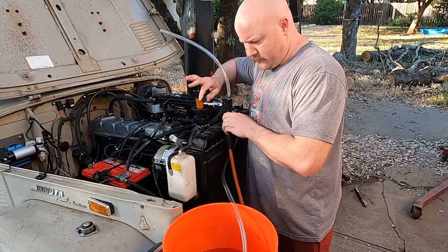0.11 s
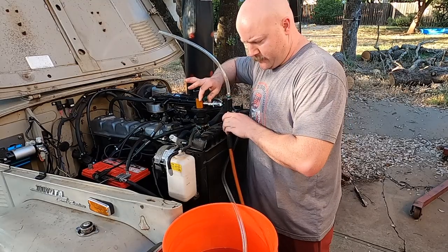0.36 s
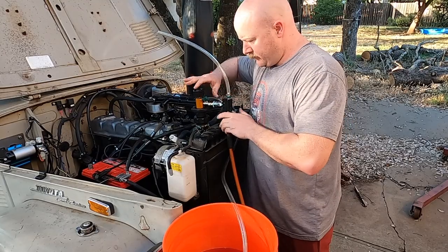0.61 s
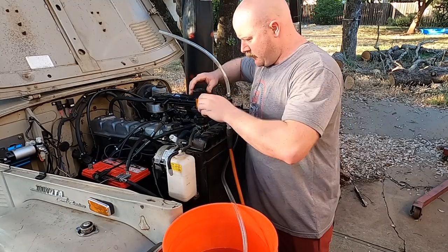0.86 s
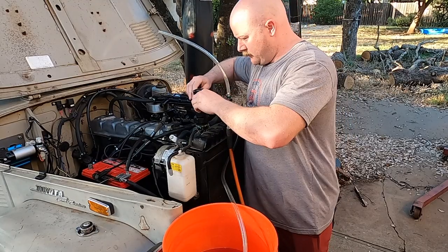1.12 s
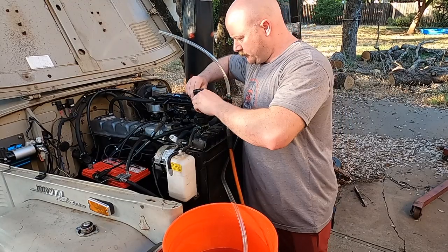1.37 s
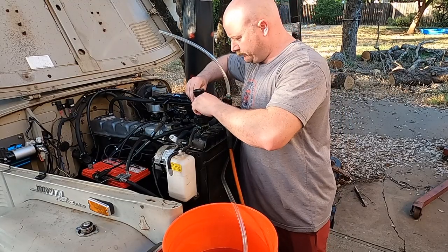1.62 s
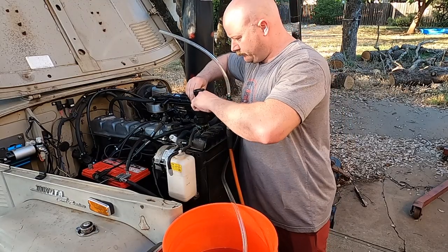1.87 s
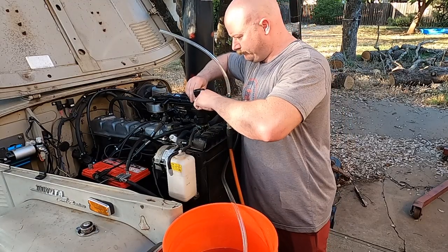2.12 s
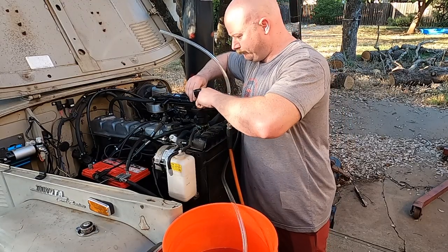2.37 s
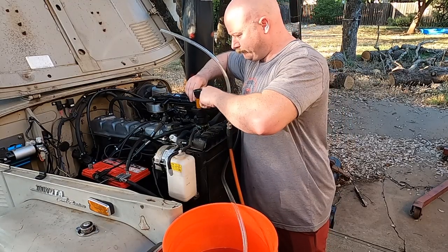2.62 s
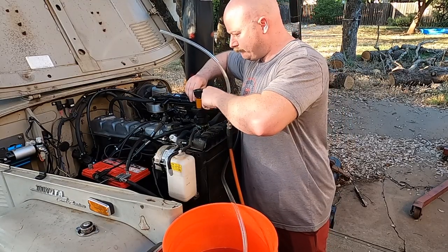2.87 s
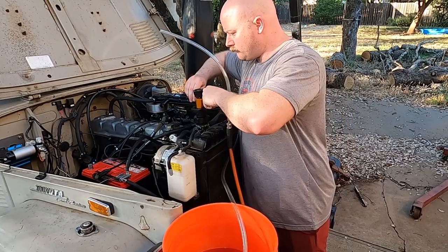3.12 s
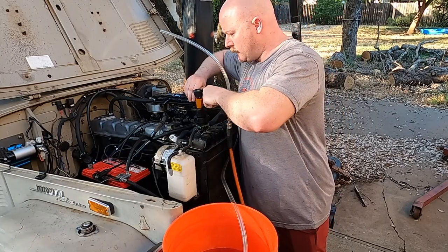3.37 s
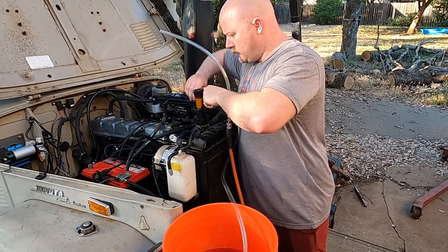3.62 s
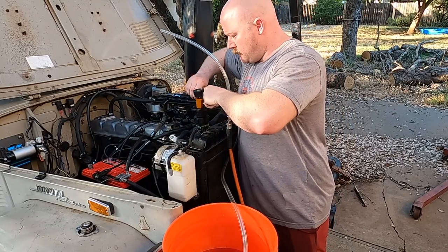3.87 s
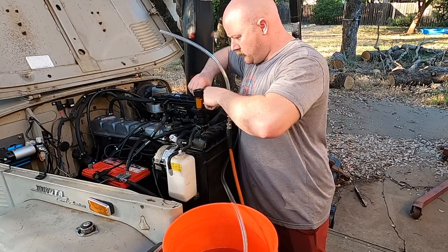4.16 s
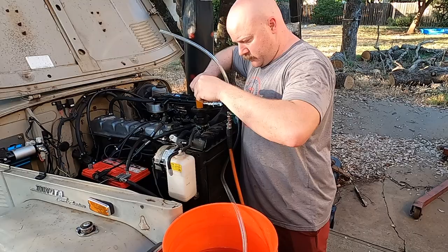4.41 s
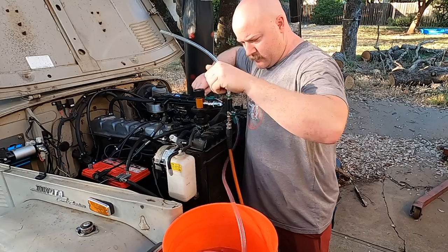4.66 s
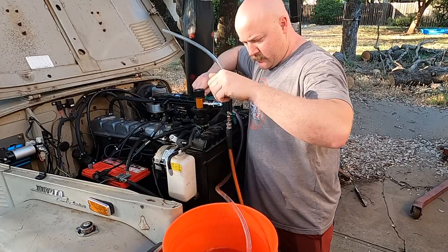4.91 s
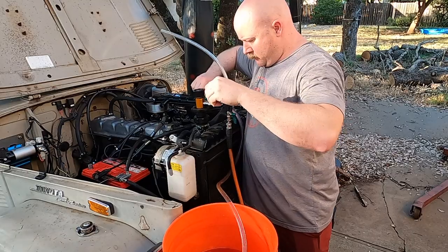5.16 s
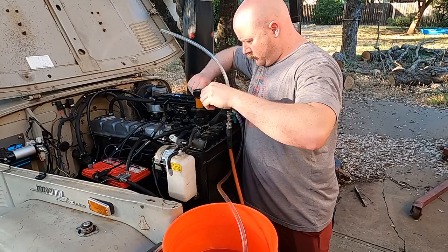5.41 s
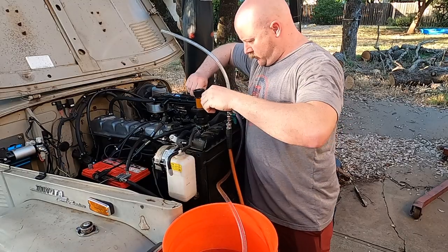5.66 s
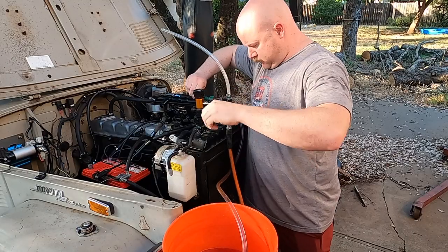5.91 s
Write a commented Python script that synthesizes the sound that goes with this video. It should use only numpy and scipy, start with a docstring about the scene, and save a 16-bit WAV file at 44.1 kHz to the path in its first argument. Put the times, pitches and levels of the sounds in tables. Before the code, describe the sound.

A steady high air jet dominates, close on the left and fainter, more diffuse on the right, with short reflections from bonnet and engine. Only a tiny early dropout interrupts it. Late on, the valve opens at once and the hiss gains low-mid body while losing some sharpness. Faint hand rubbing and a small dull knock with quick bounces follow. Slow, very low breeze rumble lies underneath.

```python
"""A bright hiss: compressed air blows through a venturi vacuum tool on a radiator, outdoors under an open bonnet.
Turbulence noise rings in the short exhaust pipe and hisses straight from the nozzle; bonnet and engine scatter it.
Near the end a valve is turned and the rush gets fuller and lower, with a dull knock and hands brushing the tool.
The left microphone is near the tool, the right one far; light wind pushes slowly on both as low noise."""
import sys
import numpy as np
from scipy import signal
from scipy.fft import rfft, irfft, next_fast_len
from scipy.io import wavfile
from scipy.ndimage import map_coordinates

SR = 44100
rng = np.random.default_rng(int(sys.argv[2]) if len(sys.argv) > 2 else 0)


def wav_record(signal):
    """Record a signal, one row per channel, as 16-bit PCM in the file named by sys.argv[1]."""
    frames = np.transpose(np.atleast_2d(signal))
    bounded = np.clip(frames, -1, 1)
    # unit amplitude maps onto the largest positive 16-bit level
    quanta = np.round(bounded * 32767).astype(np.int16)
    wavfile.write(sys.argv[1], SR, quanta)


def ratio_of_db(decibels):
    """Turn decibels (scalar or array-like) into linear amplitude factors; 0 dB maps to 1."""
    return 10 ** (np.asarray(decibels, float) / 20)


N = 265526                                                  # samples
SIZE = next_fast_len(N + 8192)                              # room for the tails
HZ = np.maximum(np.arange(SIZE // 2 + 1) * SR / SIZE, .3)   # kept above 0 for the logarithm
TIME_S = np.arange(N) / SR

# level of the shut-valve hiss, averaged over both sides, before scatter and arm; it sags from the turn on
JET_DB, SAG_DB_PER_S = -24.5, -0.1
TURN_S, TURN_LENGTH_S = 4.925, 0.01


def jet(flutter_db=-0.28, fast_db=0.32):
    """Turbulence drives the pipe and hisses beside it; the valve blends two colours of the same noise."""
    left, other = [white() * pipe() + white() * nozzle() for side in (0, 1)]
    right = far_side(left, other)
    heard = np.array([left * echoes(0) * hollows(0), right * echoes(1) * hollows(1)])
    shut = irfft(heard, SIZE)[:, :N]
    opened = irfft(heard * opened_colour(), SIZE)[:, :N]
    opening = valve()
    blend = (1 - opening) * shut + opening * opened
    sag_db = SAG_DB_PER_S * np.maximum(TIME_S - TURN_S, 0)
    level = ratio_of_db(JET_DB + sag_db + flutter_db * drift(14.0) + fast_db * drift(34.0))
    return scatter(off_arm(level * blend / np.std(shut.mean(axis=0))))


# pipe and housing resonances: f/Hz, width/Hz, level/dB
PIPE_MODES = [(619, 46.4, -20), (1014, 55.3, -11.5), (1444, 115, -17.5), (1821.5, 63.5, -9),
              (2253, 121, -10.5), (2603, 100, -7.5), (3047, 79, -6), (3404, 90, -6), (3819, 93, -4.5),
              (4239, 109, -0.7), (4676, 170, 0.05), (5123, 120, 1), (5530, 106, 2), (5850, 122, 0.5),
              (6306, 130, 0.9), (6714, 99, 0.7), (7220, 110, 0.5), (7770, 80, -1.6), (8090, 140, -4.1),
              (8320, 87, 0), (8785, 112, -1), (9130, 59, -4), (9396, 134, -4), (10270, 160, 2.5),
              (10210, 230, -4), (10930, 170, -7), (11420, 59, -4.5), (11910, 170, -6), (12040, 81, -16),
              (13000, 91, -12)]


def pipe():
    """Response of the resonances in parallel, signs alternating."""
    response = 0
    for k, (hz, width_hz, db) in enumerate(PIPE_MODES):
        response = response + (-1) ** k * ratio_of_db(db) / (1 + 1j * (HZ - hz ** 2 / HZ) / width_hz)
    return response


# hiss straight from the nozzle, between the resonances: f/Hz, level/dB per Hz
NOZZLE_COLOUR = [(150, -38.5), (400, -33.5), (700, -34.5), (1500, -24), (2800, -18.5), (4000, -24.5),
                 (5300, -8), (7000, -6), (9000, -6.5), (12500, -9), (14000, -11.5), (15000, -9),
                 (15700, -14)]


def nozzle():
    """Gain of the broad turbulence noise that bypasses the pipe."""
    return ratio_of_db(on_grid(NOZZLE_COLOUR))


# right level against left: f/Hz, level/dB
FAR_LEVEL = [(200, -7), (600, -17.5), (1100, -23), (2400, -19), (3500, -25), (4800, -34), (5600, -25),
             (6400, -19.5), (7600, -22), (8400, -15.5), (8800, -30), (10200, -24.5), (12500, -23.5),
             (15700, -20)]
# share of the right signal that is the same noise as the left: f/Hz, share (0-1)
SHARED_NOISE = [(300, .5), (1000, .95), (2500, 1), (4700, .95), (6000, .55), (8500, .4), (10500, .85),
                (15000, .65)]


def far_side(left, other):
    """The far microphone hears part of the near noise 0.21 ms late, in opposite polarity, and part of its own."""
    share = on_grid(SHARED_NOISE)
    lag = -np.exp(-2j * np.pi * HZ * .21 / 1000)
    return ratio_of_db(on_grid(FAR_LEVEL)) * (np.sqrt(share) * left * lag + np.sqrt(1 - share) * other)


# echoes off bonnet, engine and ground: delay/ms, left gain, right gain
ECHO_PATHS = [(1.35, 0.031, -0.057), (1.7, 0.051, -0.039), (2.25, -0.019, 0.04), (3.2, 0.075, 0.032),
              (8.0, 0.11, 0.091), (10.1, 0.074, 0.051)]


def echoes(side):
    """Direct path and a few short reflections."""
    return 1 + sum(row[1 + side] * np.exp(-2j * np.pi * HZ * row[0] / 1000) for row in ECHO_PATHS)


# hollows where paths cancel: f/Hz, width/Hz, left depth (0-1), right depth (0-1); depths are capped at .95
HOLLOW_BANDS = [(959.6, 71, 1, 0.8), (1622, 120, 0.57, 0.5), (2010, 71, 0.3, 0.5), (2824, 69, 0.5, 0.4),
                (3190, 74, 0.4, 0.5), (4190, 150, 0, 0.9), (4270, 76, 0.16, .7), (4600, 140, 0.06, 0.9),
                (5440, 120, 0.05, 0.8), (9550, 160, 0.2, .5)]


def hollows(side):
    """Narrow dips cut into the hiss."""
    out = 1
    for hz, width_hz, *depth in HOLLOW_BANDS:
        shape = 1 + ((HZ - hz) * 2 / width_hz) ** 2
        out = out * (1 - np.clip(depth[side], 0, .95) / shape)
    return out


# colour change with the valve open: f/Hz, level/dB
OPENED_COLOUR = [(300, 7.5), (500, 17), (800, 5), (1300, 16.5), (2000, 14), (3000, 8), (4000, 7),
                 (5000, -3.5), (7000, -7), (9000, -3.2), (12000, 0), (15000, -2.5)]


def opened_colour():
    """Gain that turns the shut-valve hiss into the fully opened one."""
    return ratio_of_db(on_grid(OPENED_COLOUR))


# the valve leaks a little at first, seals slowly, then is turned open (openings 0-1)
LEAK, LEAK_FADE_S, OPENING = 0.047, 1.9, 0.53
# handle nudged wider for a moment: t/s, extra opening (0-1), half length/s
HANDLE_NUDGES = [(4.96, 0, 0.12), (5.84, 0.1, 0.15)]


def valve():
    """Opening 0-1: a fading leak, the turn, and the nudges after it."""
    turned = np.clip((TIME_S - TURN_S) / TURN_LENGTH_S, 0, 1)
    nudged = 0
    for at, more, half_s in HANDLE_NUDGES:
        nudged = nudged + more * np.clip(1 - np.abs(TIME_S - at) / half_s, 0, 1)
    return (1 - turned) * LEAK * np.exp(-TIME_S / LEAK_FADE_S) + turned * (OPENING + nudged)


def off_arm(x, right_share=0.29):
    """The arm reflects the jet: a copy read through a moving delay, weaker on the right."""
    path = arm_path()
    at = np.arange(N) - in_time(path) * SR / 1000
    late = np.array([map_coordinates(side, [at], order=3) for side in x])
    return x + in_time(path, order=2) * late * [[1], [right_share]]


# hand and arm rest in poses near the tool and reflect the jet: arrival t/s, delay/ms, gain at the left
ARM_POSES = [(0, .53, .04), (.72, .55, .14), (1.5, .562, .33), (2.0, .7, .14), (2.8, .555, .28),
             (4.9, .875, .19), (5.95, .945, .2)]
MOVE_MS_PER_S, SHORTEST_MOVE_S, MOVING_GAIN = .5, .2, .05


def arm_path():
    """Rows (t/s, delay/ms, gain): poses are held between moves; in a long move the gain is low midway."""
    rows = [ARM_POSES[0]]
    for (_, ms, gain), (arrival, next_ms, next_gain) in zip(ARM_POSES, ARM_POSES[1:]):
        move_s = abs(next_ms - ms) / MOVE_MS_PER_S
        rows.append((arrival - max(move_s, SHORTEST_MOVE_S), ms, gain))
        if move_s > SHORTEST_MOVE_S:
            rows.append((arrival - move_s / 2, (ms + next_ms) / 2, MOVING_GAIN))
        rows.append((arrival, next_ms, next_gain))
    return rows


# dense scatter, near the moving worker, then the engine bay: start/ms, t60/s, left level/dB,
# right level/dB, changes per s
SCATTER_TAILS = [(.3, 0.03, -10.5, -15.5, 0.78), (3.0, 0.2, -10.5, 0, 0.33)]


def scatter(x):
    """Pairs of dying noise tails on each side, slowly blended as the worker shifts about."""
    s, out = np.arange(8192) / SR, x
    for start_ms, t60, left_db, right_db, per_s in SCATTER_TAILS:
        tails = rng.standard_normal((2, 2, len(s))) * ratio_of_db(-60 * s / t60) * (s > start_ms / 1000)
        tails /= np.linalg.norm(tails, axis=2, keepdims=True)
        first, second = irfft(rfft(x, SIZE) * rfft(tails, SIZE), SIZE)[:, :, :N]
        angle = np.pi * drift(per_s)
        out = out + ratio_of_db([[left_db], [right_db]]) * (np.cos(angle) * first + np.sin(angle) * second)
    return out


def dip(at_s=.3175, half_ms=8.8):
    """Gain that fades to nothing and back for a moment."""
    return np.clip(np.abs(TIME_S - at_s) * 1000 / half_ms, 0, 1)


# a dull knock and its bounces: t/s, strike level/dB
KNOCK_STRIKES = [(5.174, -28.5), (5.194, -31), (5.217, -33)]
# what the knock rings with: f/Hz, level/dB, t60/s
KNOCK_RINGS = [(185, -13, 0.11), (371, -5, 0.15), (620, -11, 0.1), (870, -4.5, 0.059)]


def knocks(right_db=-17.0, thin_hz=110):
    """Each knock strikes every mode; a light object gives no deep bass."""
    out, clicks = np.zeros(N), np.full(N, 1e-18)
    for s, db in KNOCK_STRIKES:
        clicks[round(s * SR)] = ratio_of_db(db)
    for hz, level_db, t60 in KNOCK_RINGS:
        r, w = ratio_of_db(-60 / (t60 * SR)), 2 * np.pi * hz / SR   # decay per sample, turn per sample
        out += ratio_of_db(level_db) * signal.lfilter([0, np.sin(w)], [1, -2 * r * np.cos(w), r * r], clicks)
    thin = signal.butter(4, thin_hz, "high", fs=SR, output="sos")
    return signal.sosfilt(thin, out) * ratio_of_db([[0], [right_db]])


def rustle(right_db=-17.0):
    """Dull band of noise under the brushing hands."""
    band = signal.butter(2, [260, 1500], "band", fs=SR, output="sos")
    noise = rms_one(signal.sosfilt(band, rng.standard_normal((2, N))))
    return noise * brushing() * ratio_of_db([[0], [right_db]])


# hands brush the tool: t/s, level/dB at the left while held, hold/s
HAND_BRUSHES = [(4.86, -42.5, 0.005), (5.003, -44, 0.043), (5.182, -38.5, 0.018), (5.324, -41.5, 0.005),
                (5.76, -40.5, 0.12)]
BRUSH_RISE_DB_PER_S, BRUSH_FALL_DB_PER_S = 398, 228


def brushing():
    """Each brush rises, holds and falls at steady rates in dB."""
    out = 0
    for at, db, hold_s in HAND_BRUSHES:
        rise_db = BRUSH_RISE_DB_PER_S * np.maximum(at - TIME_S, 0)
        fall_db = BRUSH_FALL_DB_PER_S * np.maximum(TIME_S - at - hold_s, 0)
        out = out + ratio_of_db(db - rise_db - fall_db)
    return out


# strength of the breeze, as pressure swings at the left microphone: t/s, level/dB
BREEZE = [(0, -22), (.5, -26.5), (1.15, -20), (1.5, -33), (1.9, -22), (2.5, -32.5), (3.1, -34.5),
          (3.6, -37), (4.0, -35), (4.3, -24), (5.2, -51.5), (5.6, -26.5), (6.02, -35.5)]
# colour of the slow pressure swings: f/Hz, level/dB per Hz
SWING_COLOUR = [(1, 7), (3, 2), (6, 7), (10, -42.5), (16, -10), (30, -77)]
# colour of the rumble: f/Hz, level/dB per Hz
RUMBLE_SPECTRUM = [(10, -15), (18, -17), (30, -5), (60, -7), (120, -19.5), (250, -33), (400, -29)]
# eddies at the microphone ports: level in the mean breeze, share of the breeze's swing they follow
RUMBLE_DB, RUMBLE_FOLLOWS = -53.5, 0.98


def wind(lower_db=3.5, uneven_db=0.5, upper_db=5.0, split_hz=90):
    """Slow pressure swings and a rumble; its level above split_hz fluctuates independently of the part below."""
    gust_db = in_time(BREEZE)
    swings = ratio_of_db(gust_db) * pair(SWING_COLOUR, alike=.6)
    rumble_db = RUMBLE_DB + RUMBLE_FOLLOWS * (gust_db - gust_db.mean()) + uneven_db * drift(3.2)
    rumble = ratio_of_db(rumble_db) * pair(RUMBLE_SPECTRUM, alike=1.0)
    lower, upper = [signal.sosfilt(signal.butter(2, split_hz, kind, fs=SR, output="sos"), rumble)
                    for kind in ("low", "high")]
    return swings + ratio_of_db(lower_db * drift(7.1)) * lower + ratio_of_db(upper_db * drift(6.4)) * upper


def pair(colour, alike, right_db=-10.5):
    """Coloured noise, partly or wholly common to both microphones and weaker on the right."""
    left, other = [rms_one(irfft(white() * ratio_of_db(on_grid(colour)), SIZE)[:N]) for side in (0, 1)]
    return np.array([left, ratio_of_db(right_db) * (alike * left + np.sqrt(1 - alike ** 2) * other)])


def white():
    """Spectrum of fresh white noise."""
    return rfft(rng.standard_normal(SIZE))


def drift(rate):
    """Slow chance with spread 1: noise through two equal poles at rate/Hz, drawn every 40 samples."""
    r = np.exp(-80 * np.pi * rate / SR)
    slow = signal.lfilter([1], [1, -2 * r, r * r], rng.standard_normal(N // 40 + 2002))[2000:]
    return np.interp(np.arange(N) / 40, np.arange(len(slow)), rms_one(slow))


def rms_one(x):
    """Scales to unit rms."""
    return x / np.sqrt(np.mean(x ** 2) + 1e-20)


def in_time(rows, order=1):
    """One column of a curve read at every sample."""
    rows = np.array(rows)
    return np.interp(TIME_S, rows[:, 0], rows[:, order])


def on_grid(points):
    """Second column of a spectrum read at every frequency, along log frequency."""
    points = np.array(points)
    return np.interp(np.log(HZ), np.log(points[:, 0]), points[:, 1])


def scene():
    """All sources at the two microphones; the hiss dips briefly."""
    return dip() * jet() + knocks() + rustle() + wind()


def band_limit(x):
    """A steep low-pass at the top of the band."""
    return signal.sosfilt(signal.butter(12, 16700, fs=SR, output="sos"), x)


def record(dry):
    """A steep top cut at 15730 Hz, then a steep low-pass at 16700 Hz, finishes the mix."""
    cut = irfft(rfft(dry, SIZE) * (HZ < 15730), SIZE)[:, :N]
    return band_limit(cut)


dry = scene()
out = record(dry)
wav_record(out)
```